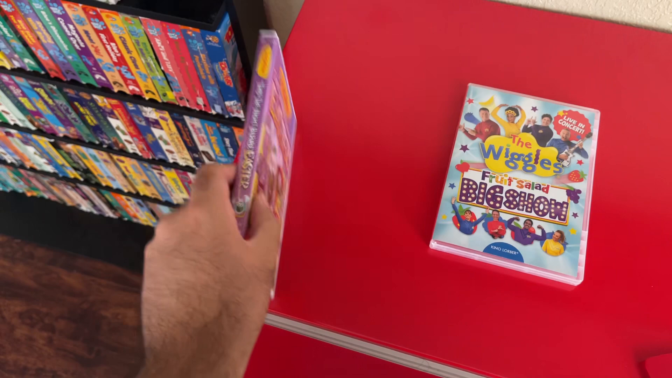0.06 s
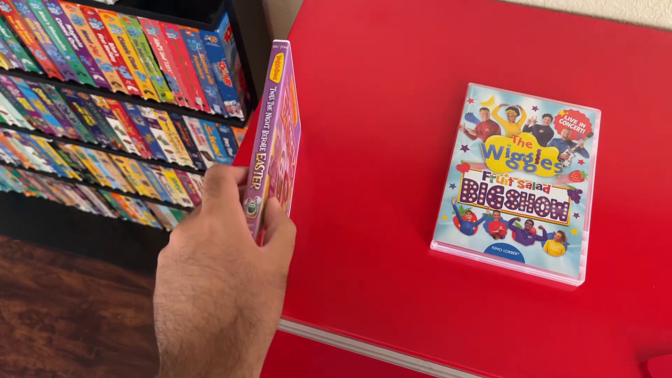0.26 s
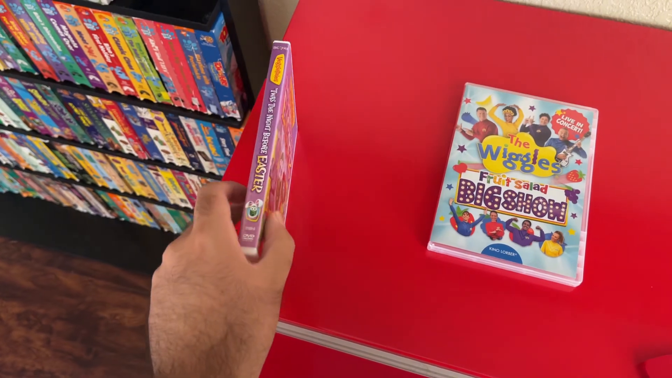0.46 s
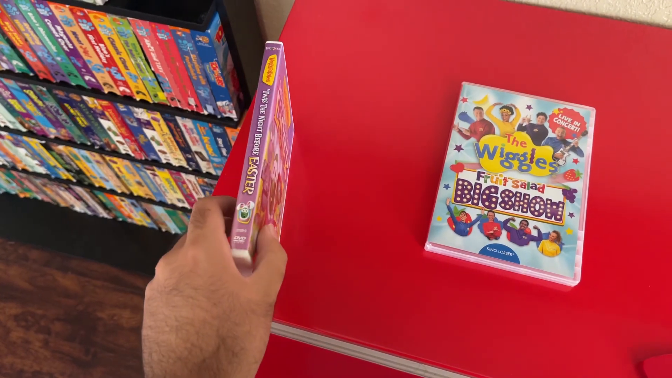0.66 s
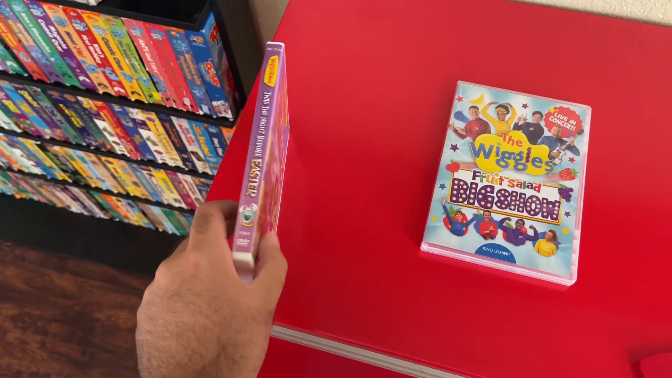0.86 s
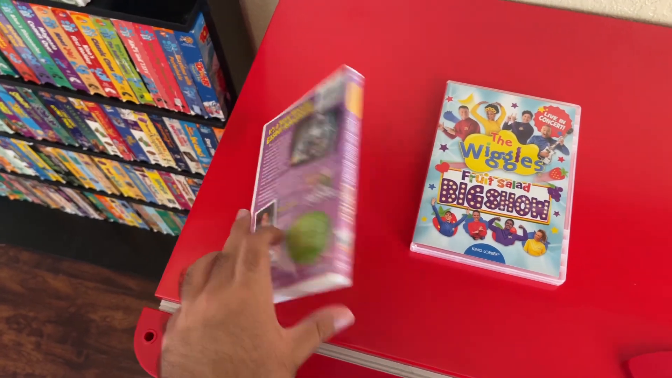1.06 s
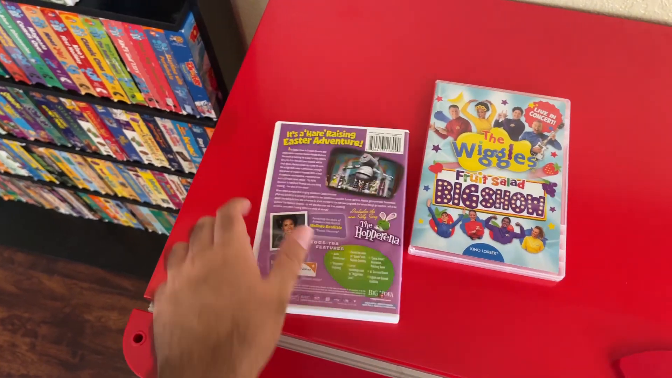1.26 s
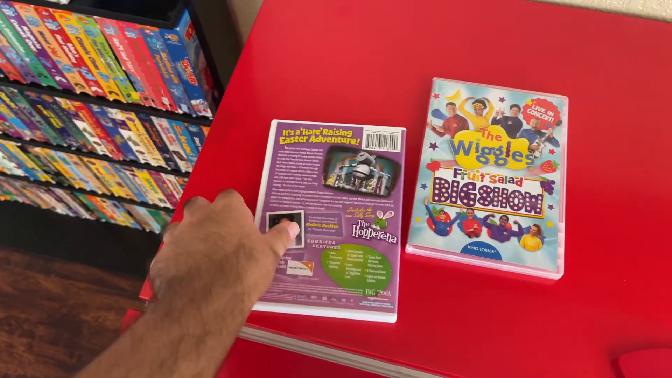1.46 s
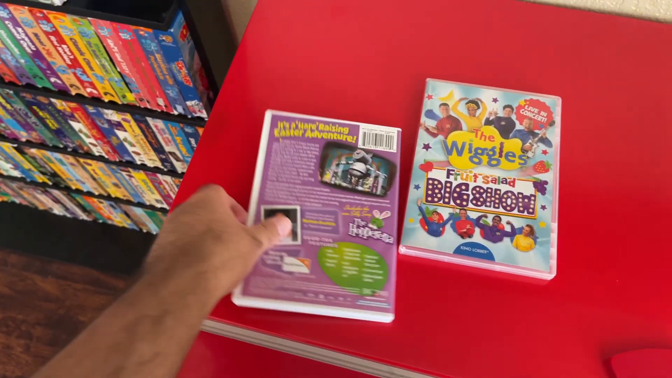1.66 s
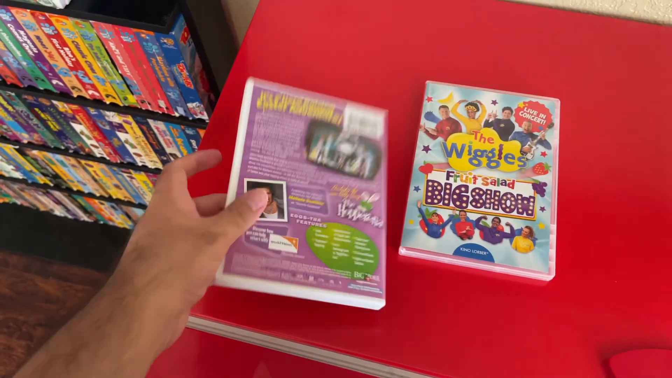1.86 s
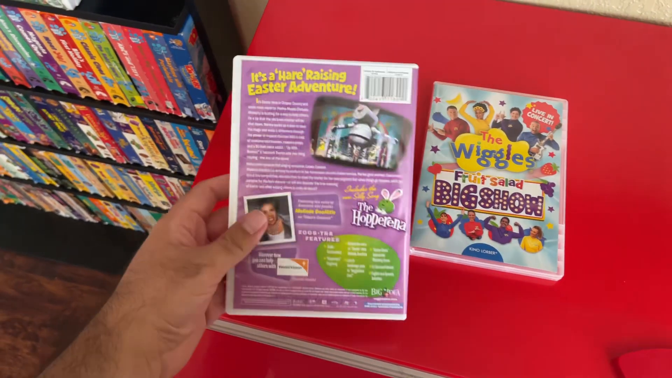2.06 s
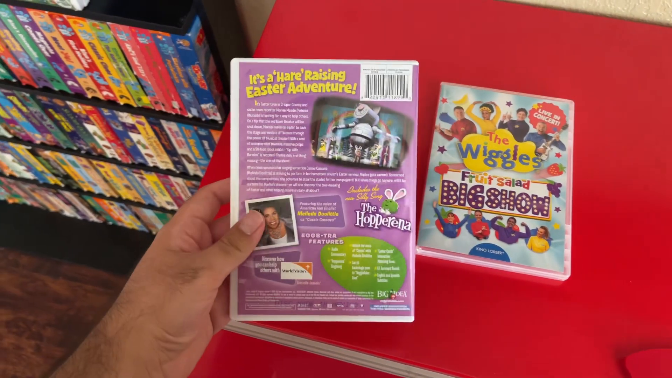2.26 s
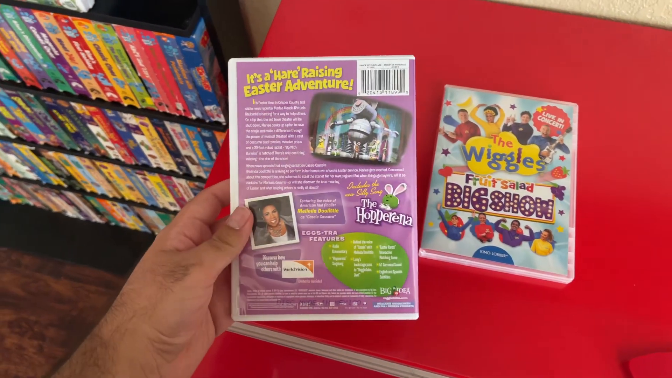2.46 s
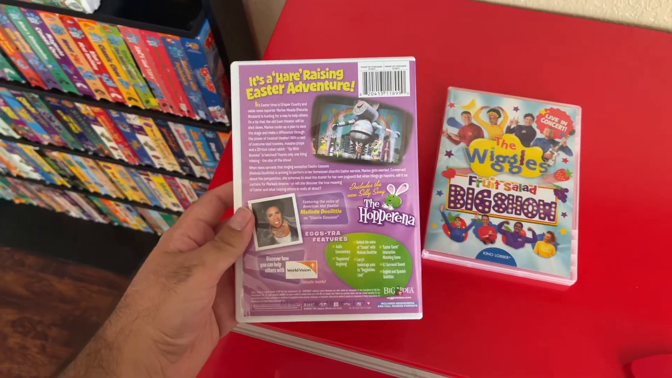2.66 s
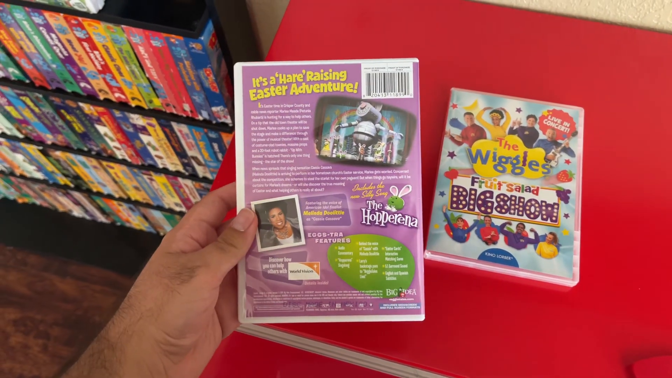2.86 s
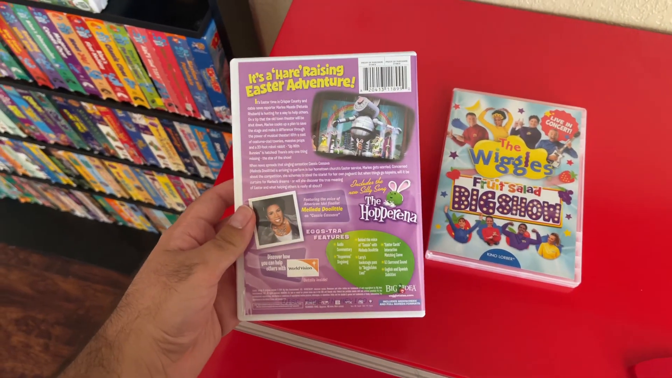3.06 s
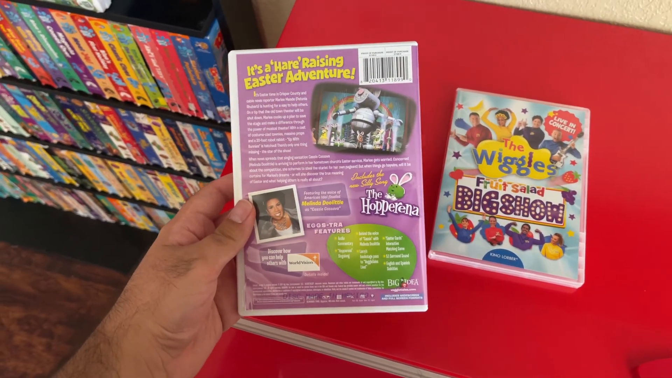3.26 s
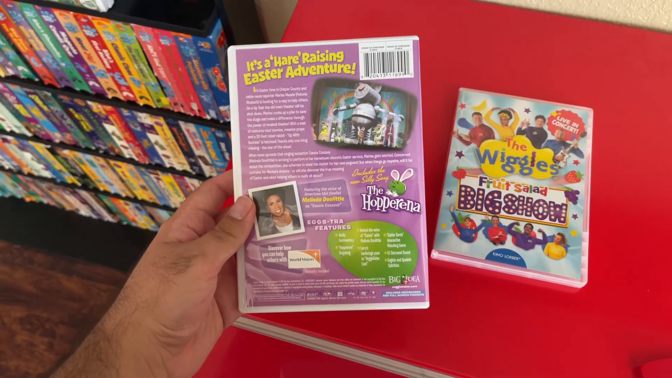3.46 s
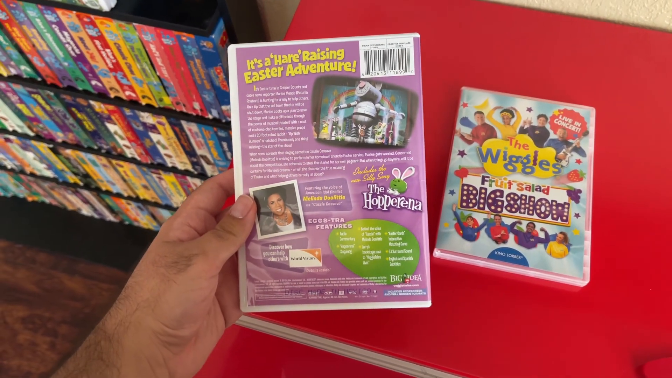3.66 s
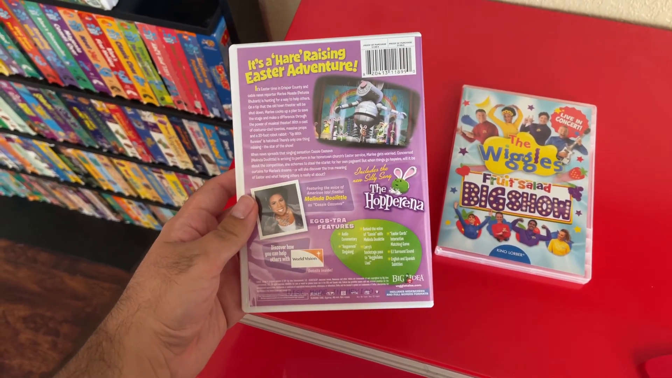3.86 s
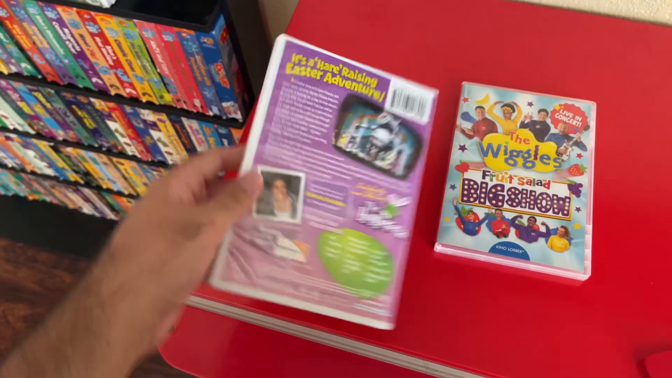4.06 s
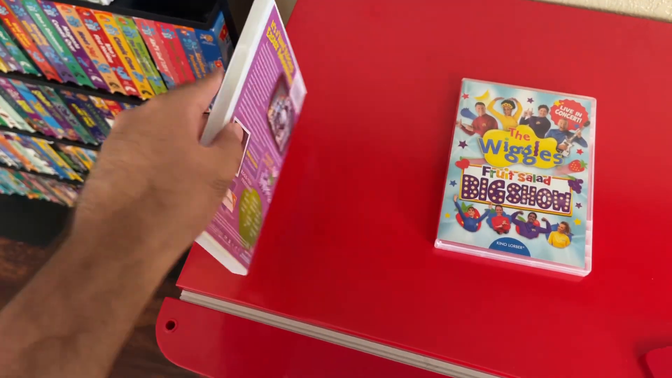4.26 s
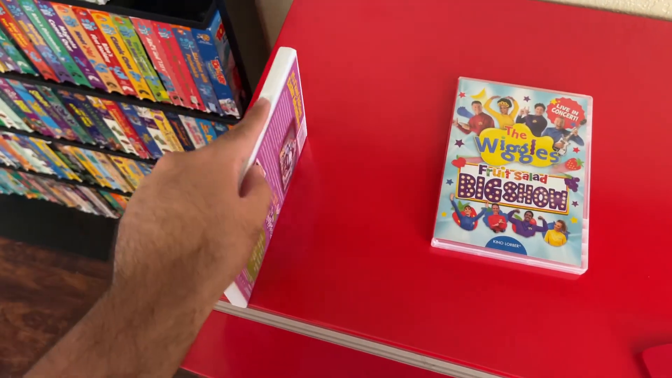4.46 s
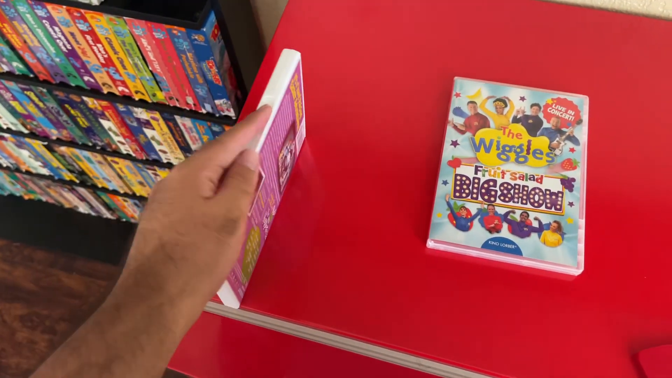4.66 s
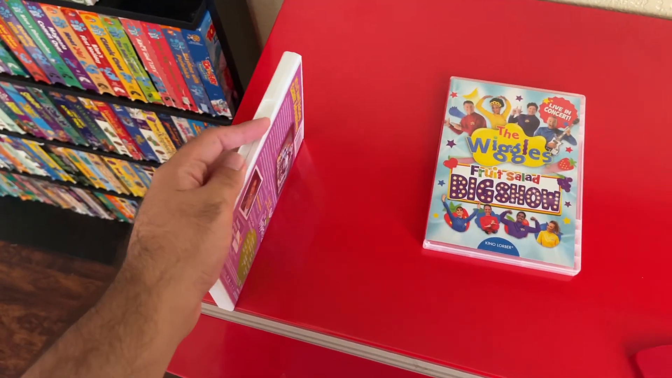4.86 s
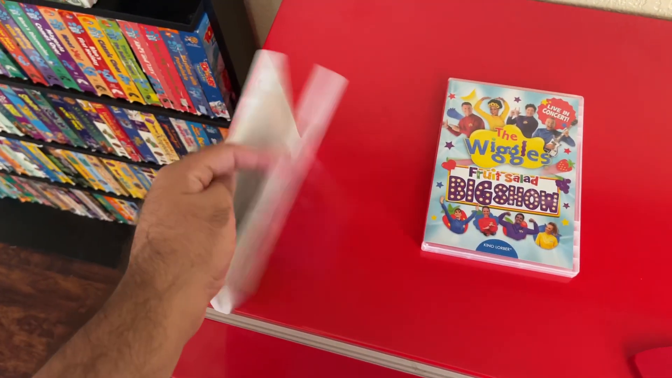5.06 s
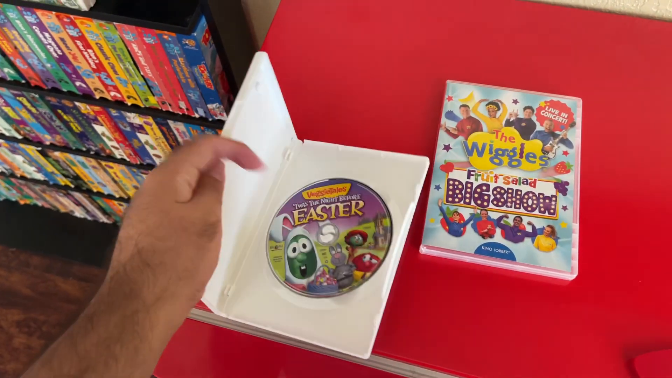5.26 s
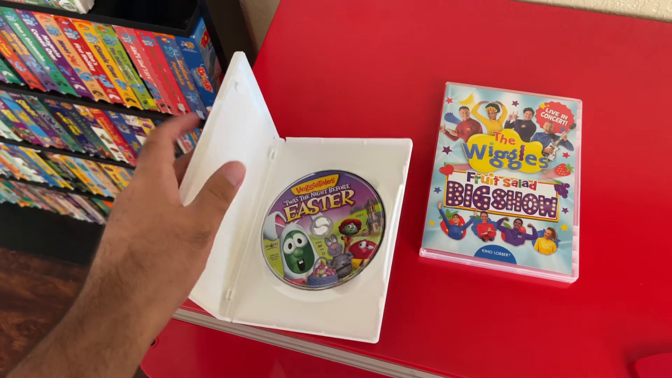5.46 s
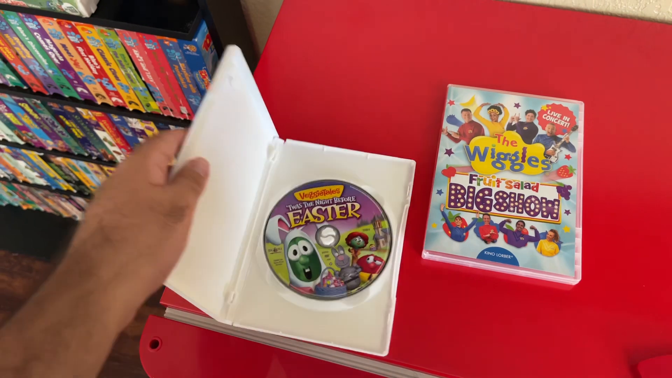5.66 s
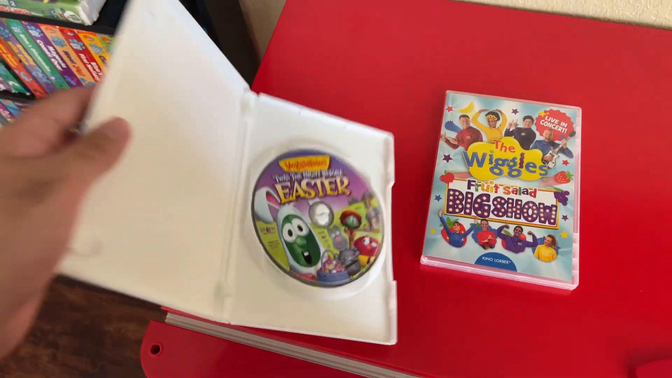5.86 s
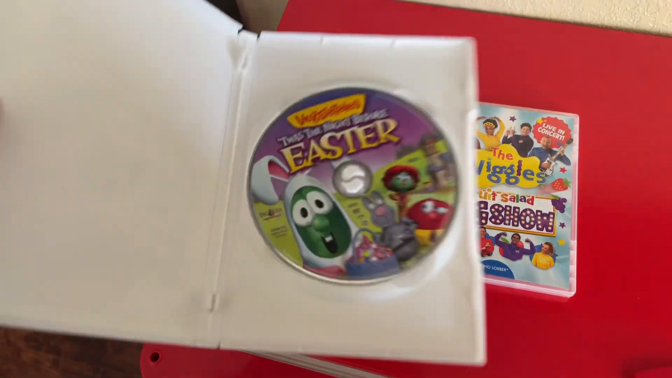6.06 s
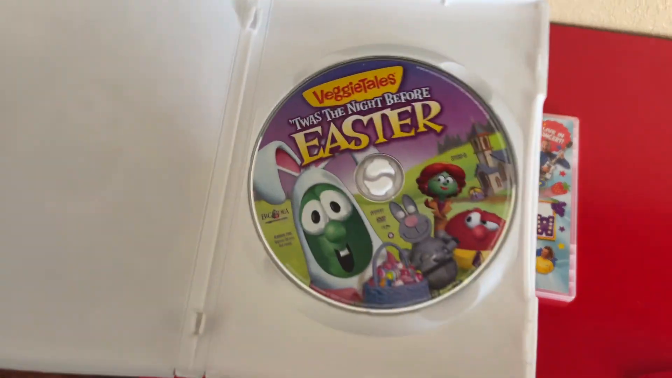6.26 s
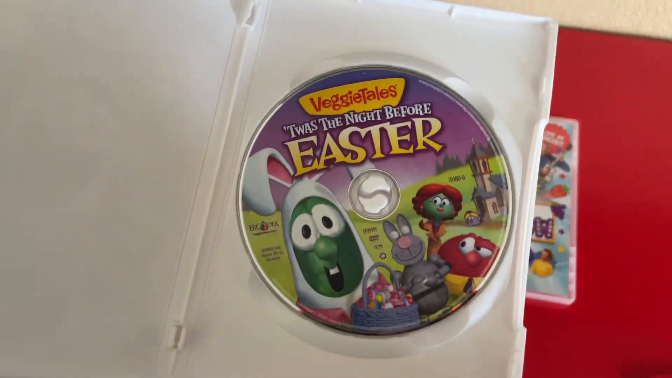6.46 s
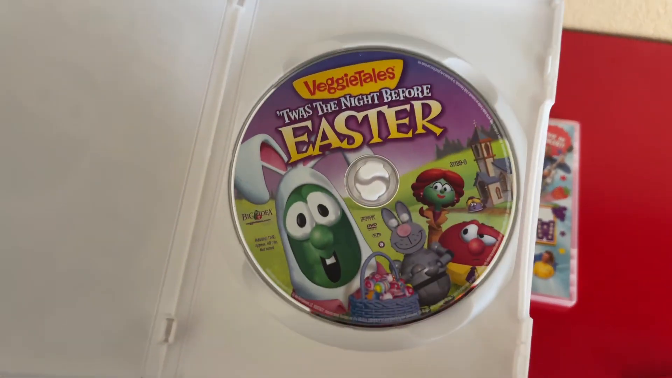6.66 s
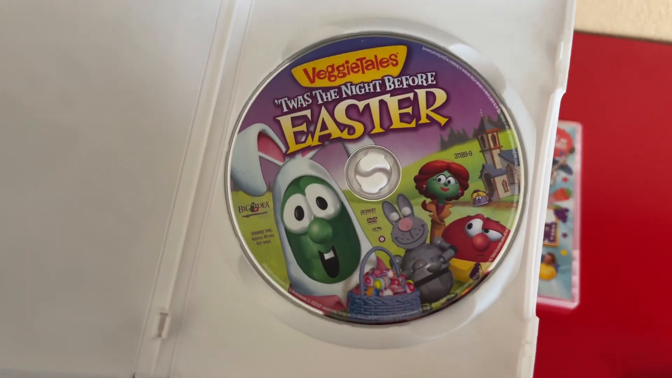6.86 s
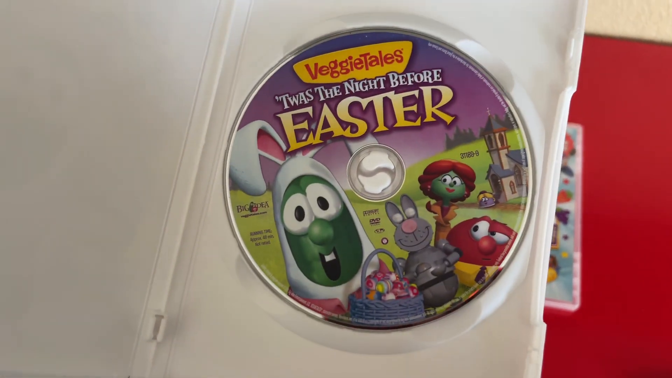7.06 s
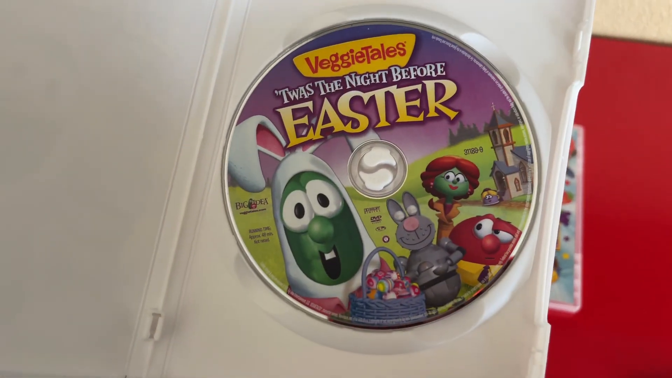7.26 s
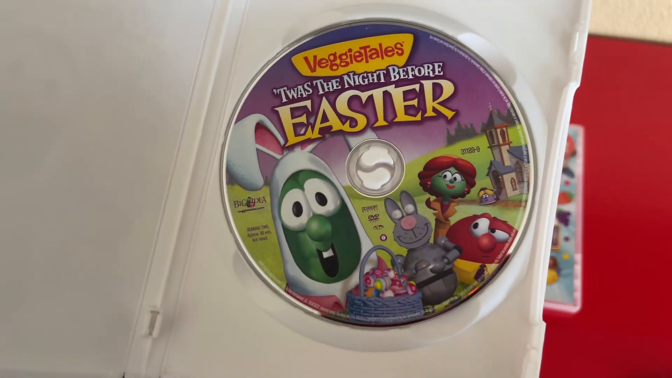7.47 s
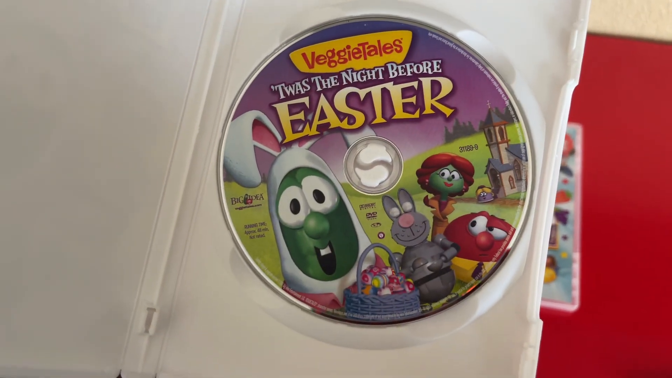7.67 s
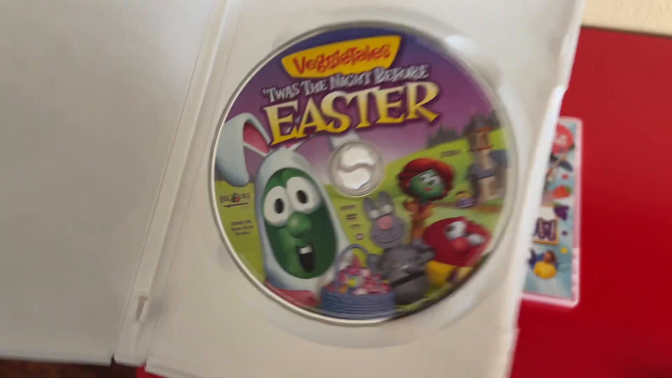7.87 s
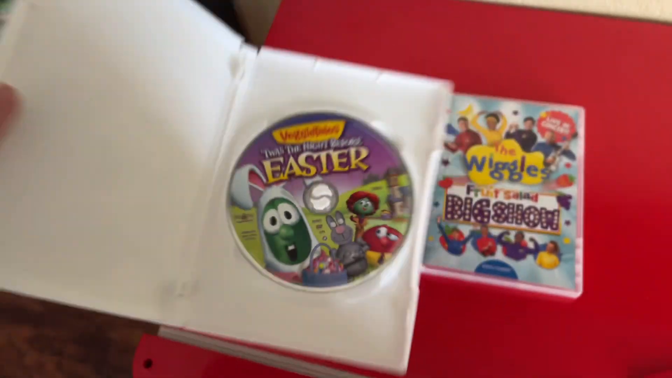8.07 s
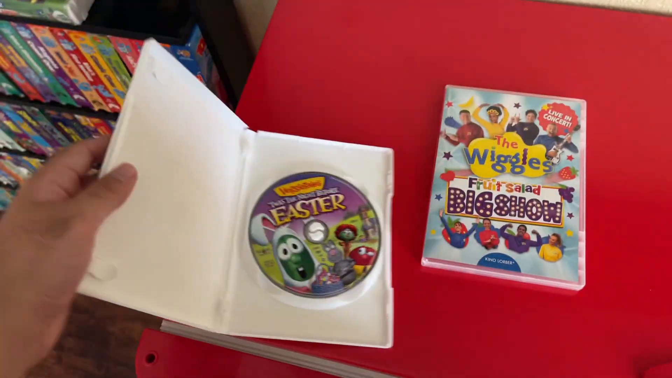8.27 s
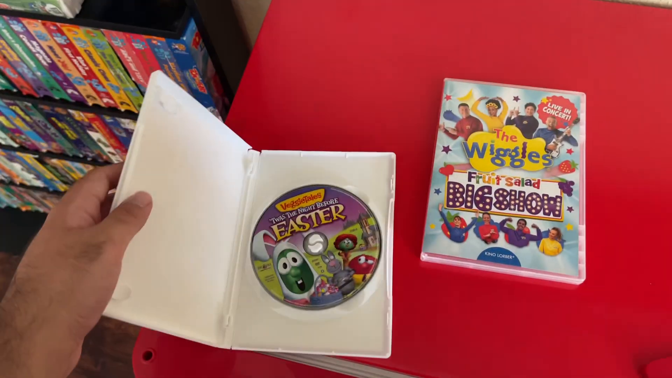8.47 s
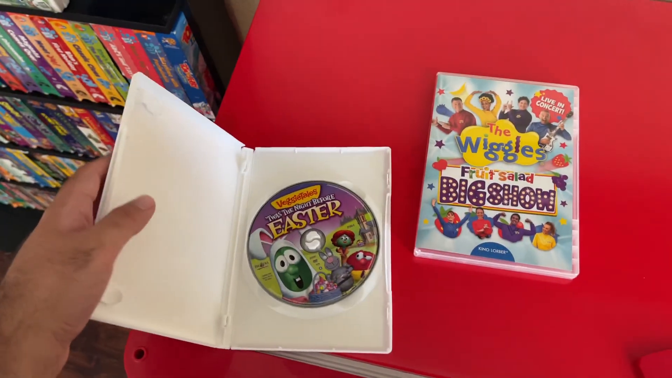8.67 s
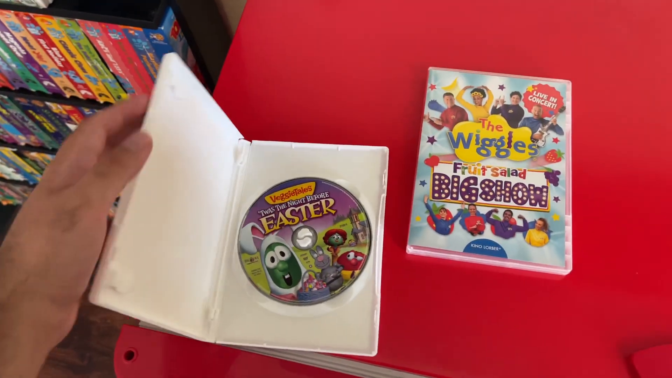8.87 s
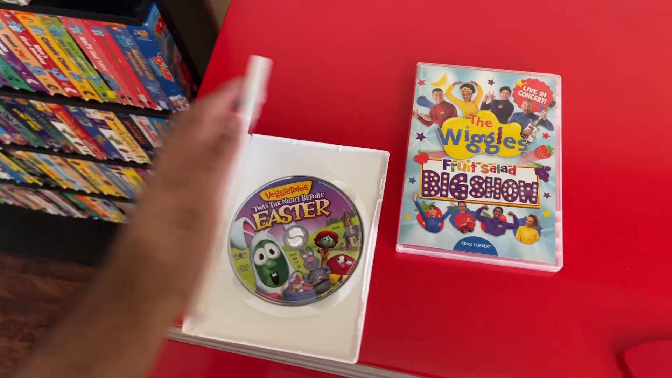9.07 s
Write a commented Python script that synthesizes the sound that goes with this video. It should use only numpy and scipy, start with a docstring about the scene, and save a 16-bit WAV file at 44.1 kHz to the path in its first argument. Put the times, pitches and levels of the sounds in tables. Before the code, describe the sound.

A thin plastic disc case is knocked, dropped flat, turned over, snapped open and set down on a sheet-metal top over a low steady hum.

```python
"""Disc case handled on sheet metal

A thin plastic disc case is stood up, dropped flat, picked up, snapped open and set down on a sheet-metal top.
Each contact is a short noise burst that rings the modes of case and top and dies away in a small room;
fingers sliding on the sleeve are swelling strokes of noise, pushed air is a short low swing.
A compressor hums nearby as a comb of thin sine overtones, over a filtered-noise room rumble and hiss."""
import sys
import numpy as np
from scipy import signal
from scipy.fft import rfft, irfft, next_fast_len
from scipy.io import wavfile

SR = 44100
rng = np.random.default_rng(int(sys.argv[2]) if len(sys.argv) > 2 else 0)


def wrap_up_sound(samples):
    """Save the sound to the file named by the first command line argument, as 16-bit audio."""
    columns = np.atleast_2d(samples).T
    # keep every value between -1 and 1, then stretch to whole-number steps
    tamed = np.clip(columns, -1, 1)
    steps = np.round(tamed * 32767).astype(np.int16)
    wavfile.write(sys.argv[1], SR, steps)


N = 401751


def amp(db):
    """Turn dB into gain."""
    return np.exp(np.asarray(db) * (np.log(10) / 20))


def rms_one(x):
    """Scale to rms 1."""
    return x / np.sqrt(np.mean(x ** 2) + 1e-20)


def at_hz(points, hz):
    """Read a (Hz, value) table on a log-frequency axis."""
    table = np.array(points)
    return np.interp(np.log(hz), np.log(table[:, 0]), table[:, 1])


def sides(pan_db):
    """Left and right gains for a left-minus-right balance in dB."""
    return amp(np.array([[.5], [-.5]]) * pan_db)


def drift(rate):
    """Slow random wander of spread 1, made from twice-smoothed noise; a higher rate wanders faster."""
    step = 40   # samples between slow values
    pole = np.exp(-2 * step * np.pi * rate / SR)
    white = rng.standard_normal(N // step + 2002)
    slow = signal.lfilter([1], [1, -2 * pole, pole * pole], white)[2000:]   # settled part only
    return np.interp(np.arange(N) / step, np.arange(len(slow)), rms_one(slow - slow.mean()))


def bands(length, spectrum):
    """Third-octave bands of stereo noise, each with its level and left-right likeness: yields (Hz, band)."""
    # How alike left and right are. Each row: frequency in Hz, likeness (1 is identical, 0 is unrelated).
    likeness = [(60, 1), (200, .93), (400, .75), (700, .45), (1300, .3), (3000, 0.46), (6000, 1),
                (9000, 0.68)]
    edges = 22.5 * 2 ** (np.arange(30) / 3)
    white = rng.standard_normal((2, 2, length))
    edges = edges[edges > spectrum[0][0] / 2]
    for k, (low, high) in enumerate(zip(edges, edges[1:])):
        band_filter = signal.butter(2, [low, high], "band", fs=SR, output="sos")
        mid, side = signal.sosfilt(band_filter, white[k % 2])   # neighbouring bands use separate noise
        hz = np.sqrt(low * high)
        alike = np.clip(at_hz(likeness, hz), -1, 1)
        stereo = np.sqrt(1 + alike) * mid + np.sqrt(1 - alike) * side * [[1], [-1]]
        yield hz, amp(at_hz(spectrum, hz)) * stereo


def room_noise():
    """Steady rumble and hiss: shaped noise with each band flickering a little."""
    # Colour of the rumble and hiss. Each row: frequency in Hz, relative density in dB per Hz.
    noise_colour = [(25, -30.5), (45, -2), (70, -5.5), (95, -13.5), (160, -9), (250, -21.5), (500, -29),
                    (1000, -41), (1700, -43.5), (2100, -39.5), (2500, -49.5), (4100, -49), (5200, -65),
                    (7200, -64), (8800, -56.5), (11000, -61.5), (13000, -75.5)]
    level_db = -49   # rms
    noise = sum(band * amp(1.4 * drift(3.0)) for hz, band in bands(N, noise_colour))
    return amp(level_db) * rms_one(noise)


def compressor():
    """Sine hum, overtones that change with the place of the microphone, and a separate whine."""
    # The fundamental. Each row: time in seconds, level in dB rms before panning.
    hum_level = [(0.0, -35.5), (1.37, -37), (1.77, -34.5), (3.27, -37), (6.54, -35), (9.11, -35.5)]
    # Place of the microphone. Each row: time in seconds, closeness (0 held back, 1 held close).
    closeness = [(5.7, 0.017), (6.1, 1), (7.9, 0.97), (8.3, 0)]
    # Overtone numbers, one per row of the next table: multiples of the motor speed.
    multiples = [9, 15, 18, 19, 24, 31, 33, 34, 35, 36, 37, 38, 47, 48, 52, 53, 61, 65, 66, 71]
    # Each row: level in dB rms held back, level in dB rms held close, left-minus-right in dB,
    # left lead in radians.
    overtones = [(-75.5, -75.5, 9.5, 0.86), (-81.5, -88, 0.5, 0.44), (-84.5, -83, -2.5, -1.2),
                 (-84.5, -84.5, 8.5, 1.35), (-91, -88.5, -4.5, 0.1), (-91.5, -88, -3.5, -0.5),
                 (-73.5, -91, -2, -0.4), (-71, -74.5, -0.5, -1.2), (-81, -76, 5, 0), (-77.5, -83, 9.5, 1.2),
                 (-78, -79, -2.5, 0.3), (-87.5, -89, 1, -0.2), (-91.5, -99, 6.5, 0.0),
                 (-91, -82, -3.5, 1.5), (-84, -90.5, 1, 0.7), (-81.5, -85.5, 3, 2.1), (-88, -101, 5, 1.0),
                 (-82.5, -87, -2.5, 0.65), (-86.5, -100.5, -3.5, 0.5), (-88.5, -82, -1.5, 0.24)]
    motor_hz, whine_hz = 59.21, 360.7
    hum_pan_db, whine_db = -2.5, -66.5
    rattle_back_db, rattle_close_db = -101, -107   # per line of the faint high cluster, before scatter

    t = np.arange(N) / SR
    turn = 2 * np.pi * motor_hz * t
    close = np.interp(t, *np.transpose(closeness))
    out = amp(np.interp(t, *np.transpose(hum_level))) * np.sin(turn) * sides(hum_pan_db)

    angle = turn % (2 * np.pi)
    for multiple, (back_db, close_db, pan_db, lead) in zip(multiples, overtones):
        level = amp(back_db + (close_db - back_db) * close + 0.98 * drift(.5))
        phase = multiple * angle + rng.uniform(0, 2 * np.pi) + [[lead], [0]]
        out += level * np.sin(phase.astype(np.float32)) * sides(pan_db)

    # one turn of the cluster at multiples 128 to 161, read again on every turn
    cycle = np.linspace(0, 2 * np.pi, 16384)
    cluster = sum(amp(rng.normal(0, 4.0)) * np.sin(k * cycle + rng.uniform(0, 2 * np.pi))
                  for k in range(128, 162))
    rattle_db = rattle_back_db + (rattle_close_db - rattle_back_db) * close + 1.5 * drift(0.45)
    out += amp(rattle_db) * np.interp(angle, cycle, cluster)

    whine_level = amp(whine_db + 0.97 * drift(1.5))
    whine = np.sin(2 * np.pi * whine_hz * t + 0.72 * drift(1.5))
    out += whine_level * whine * sides(hum_pan_db)
    return np.sqrt(2) * out   # sine levels become rms


def chatter(age):
    """Spectra of two unrelated noise bursts that swell and die, their spectra evened out."""
    burst = rfft(rng.standard_normal((2, len(age))) * (1 - np.exp(-2.5 * age)) * np.exp(-age))
    even = irfft(burst / np.abs(burst) ** .8, len(age))
    return rfft(even * np.clip(4 * age, 0, 1) * (age < 7))


def contact_colour(hz, knock_db, knock_hz, snap_db, snap_hz, tick_db, softness):
    """Knock, snap and tick fall away from their pitches and add in power; soft touches dull the first two."""
    tick_hz = 11000   # where the tick is strongest
    knock_fall_db, snap_fall_db, tick_fall_db = 13, 8.5, 20.5   # per octave away from each pitch
    soft_fall_db = 7   # further loss per octave above the snap, for each step of softness
    dull_db = soft_fall_db * (softness - 1) * np.maximum(np.log2(hz / snap_hz), 0)
    humps = [(knock_db - dull_db, knock_hz, knock_fall_db),
             (snap_db - dull_db, snap_hz, snap_fall_db),
             (tick_db, tick_hz, tick_fall_db)]
    power = sum(amp(db - fall_db * np.abs(np.log2(hz / top_hz))) ** 2 for db, top_hz, fall_db in humps)
    return 10 * np.log10(power)


def contacts():
    """Each contact is a burst of chatter that cracks, and strikes every mode with a strength of its own."""
    # Blows and touches. Each row: start in seconds, knock of case and top in dB, its pitch in Hz,
    # snap of the plastic in dB, its pitch in Hz, tick of the edge in dB, length in ms before softening.
    contact_rows = [(0.0779, -28.5, 500.0, -49, 3400.0, -49, 2), (0.084, -20.5, 370.0, -44, 1800, -47, 3.9),
                    (0.0897, -23, 490.0, -32.5, 4890, -30, 3), (0.0935, -23, 680, -60, 900.0, -52.5, 1.7),
                    (0.103, -25, 220.0, -46, 1800.0, -55.5, 4), (1.063, -60, 240.0, -60, 3903, -69, 6.9),
                    (1.162, -6, 330, -14, 1120, -28, 1.1), (1.1854, -30, 870.0, -30, 3600, -40, 4.1),
                    (1.192, -29, 600, -36, 3400, -54, 3.1), (1.202, -25, 270.0, -35, 1000.0, -63, 1.9),
                    (1.313, -37, 370.0, -70, 6000.0, -90, 2), (1.451, -46, 290.0, -48.5, 990, -62, 3.2),
                    (1.468, -44, 340.0, -59, 3500, -90, 4.0), (1.508, -56, 400.0, -61.5, 1800.0, -90, 1.5),
                    (1.65, -57, 340.0, -55.5, 1000.0, -78, 2.1), (1.761, -39.5, 300.0, -42, 1200, -58, 1.9),
                    (1.772, -43, 250.0, -49.5, 1300.0, -76, 2.3), (1.852, -45, 900, -47.5, 4000, -68, 1.8),
                    (1.939, -47.5, 600, -48, 3000, -90, 2.7), (1.96, -48, 620, -52, 3000, -75, 3.2),
                    (2.036, -52, 950, -56, 3000, -90, 0.9), (2.094, -58, 950, -57, 2800, -90, 2.7),
                    (4.238, -51.5, 230.0, -62.5, 2500.0, -66, 3.1),
                    (4.311, -50.5, 560.0, -54.5, 2500.0, -54, 3.2),
                    (4.388, -19, 420, -30.5, 990, -30.5, 2.8), (4.404, -21, 290.0, -46, 4500, -56, 3.9),
                    (4.415, -22.5, 310.0, -40.5, 2330, -90, 4.9),
                    (4.747, -55, 340.0, -55, 1500.0, -68, 3.0), (4.757, -46, 650.0, -49, 1700, -60, 4.0),
                    (4.77, -48, 440.0, -50, 4300, -56, 2.2), (4.831, -54, 370.0, -57, 4000, -90, 2.8),
                    (4.876, -52, 610.0, -56, 4200, -80, 4.2), (4.895, -57, 420.0, -58, 1200.0, -90, 2.2),
                    (4.919, -55, 360.0, -57, 4200, -80, 4.1), (5.0215, -28.5, 430.0, -27, 1500.0, -29, 1.5),
                    (5.025, -18, 680, -26, 5700.0, -31, 2.03), (5.036, -29, 250.0, -23.5, 4100.0, -57, 8.4),
                    (5.047, -35, 680.0, -22, 4600, -23, 3.2), (5.07, -49, 230.0, -31, 1700.0, -28, 1.7),
                    (5.088, -33, 690.0, -35, 4300.0, -49, 2.5), (5.097, -40, 370.0, -30.5, 4800, -48, 2.6),
                    (5.615, -43, 710.0, -38.5, 3300, -53, 3.2),
                    (5.621, -30, 310.0, -33.5, 2470, -35.5, 4.3), (5.63, -34, 190.0, -41, 4200, -90, 2.6),
                    (5.647, -53, 230.0, -43.5, 1800.0, -58, 1.6), (7.89, -58, 230.0, -50, 2400, -90, 2.4),
                    (8.064, -65, 230.0, -60, 1700.0, -87, 3.5), (8.095, -62, 300.0, -58, 1300.0, -80, 2.1),
                    (8.177, -29, 740.0, -29, 4000, -26, 5.0), (8.184, -20, 300.0, -18, 1900, -24, 3.2),
                    (8.196, -44, 310.0, -31, 3300, -45, 4.7), (8.212, -31.5, 290.0, -33, 3610, -90, 5.5),
                    (8.227, -32, 390.0, -27, 4200, -32, 6.3), (8.235, -37, 230.0, -36, 1300.0, -41, 2.8),
                    (8.436, -49, 320.0, -62.5, 4800.0, -79, 2.3),
                    (9.018, -59, 310.0, -57, 2700.0, -60, 4.3), (9.041, -54, 230.0, -57, 2500, -38, 3),
                    (9.053, -59, 300.0, -59, 2600.0, -39, 5.0)]
    # What case and top ring with. Each row: frequency in Hz, relative level in dB, t60 in seconds.
    case_modes = [(180, -8.5, 0.04), (270.5, 4.5, .08), (332.5, -2, 0.043), (446.8, 4.5, .05),
                  (529, -1.5, 0.032), (619, 2, .035), (814, 1.5, .03), (1040, -5.5, .025),
                  (1360, -5.5, .015), (1616, 1, 0.011), (1880, -1, 0.014), (2080, -3.5, 0.015),
                  (2570, -3.5, 0.015), (2950, -1, 0.012), (3120, -3, .01), (3700, -4.5, 0.0093),
                  (4900, -5, .007), (5330, -5.5, .006), (5900, -8, 0.0096)]
    # Edges in Hz of the parts, about an octave wide, that the colour of a contact is set in.
    part_edges_hz = [150, 350, 700, 1300, 2500, 4500, 8000, 15500]
    spread_ms = 1.6   # delay of 250 Hz behind the top, for a blow
    ring_db = 1.5   # ringing against the bare crack
    ping_db, ping_octaves = 11, .35   # modes near the pitch of the snap are struck harder

    size = 6144
    out, t = np.zeros((2, N + size)), np.arange(size) / SR
    hz = np.fft.rfftfreq(size, 1 / SR) + 1
    z = np.exp(-2j * np.pi * hz / SR)   # one sample of delay
    parts = [signal.sosfreqz(signal.butter(3, edge, "band", fs=SR, output="sos"), hz, fs=SR)[1]
             for edge in zip(part_edges_hz, part_edges_hz[1:])]
    centres = np.sqrt(np.multiply(part_edges_hz[:-1], part_edges_hz[1:]))
    modes = []
    for mode_hz, level_db, t60 in case_modes:
        r, w = amp(-60 / (t60 * SR)), 2 * np.pi * mode_hz / SR
        resonance = (1 - z * z) / (1 - 2 * r * np.cos(w) * z + r * r * z * z)
        modes.append(amp(level_db) * np.sqrt(1 - r) * resonance)
    mode_pitches = np.array(case_modes)[:, 0]
    # bending waves: delay grows as one over the root of pitch, so a blow sweeps downward, a light touch less
    sweep = -4j * np.pi * spread_ms / 1000 * np.sqrt(250 * hz)
    # the ports hear different faces of the case, most of all in the middle range
    unlike = .45 * np.clip(hz / 1200, 0, 1) * np.clip(9500 / hz - .6, .2, 1)

    for s, knock_db, knock_hz, snap_db, snap_hz, tick_db, length_ms in contact_rows:
        # light touches of soft fingers smear out
        softness = np.clip((-max(knock_db, snap_db, tick_db) - 27) / 12, 1, 2.5)
        parts_db = contact_colour(centres, knock_db, knock_hz, snap_db, snap_hz, tick_db, softness)
        mid, side = chatter(1000 * t / max(length_ms * softness, .1))

        near_snap = np.exp(-(np.log2(mode_pitches / snap_hz) / ping_octaves) ** 2)
        strength = amp(ping_db * near_snap + rng.normal(0, 3.0, len(modes)))
        rung = strength @ np.array(modes)
        body = 1 + amp(ring_db) * rung / np.sqrt(np.mean(np.abs(rung[hz < 7000]) ** 2))

        # each part carries the energy of its level held for 14 ms
        colour = 0
        for db, part in zip(parts_db, parts):
            energy = np.sum(np.abs(part * body * mid) ** 2)
            colour = colour + amp(db) * part * np.sqrt(.007 * SR * size / energy)
        pair = (mid + unlike * side * [[1], [-1]]) * body * colour * np.exp(sweep / softness)
        at = round(s * SR)
        out[:, at:at + size] += irfft(pair, size)
    return out[:, :N]


def room(x):
    """A tail of noise that builds within a few ms and dies band by band."""
    # Decay of the late tail. Each row: frequency in Hz, t60 in seconds.
    tail_t60 = [(150, 0.48), (500, 0.51), (2000, 0.49), (5000, 0.3867), (10000, 0.39), (14000, 0.02)]
    # Colour of the tail. Each row: frequency in Hz, relative density in dB per Hz.
    tail_colour = [(150, -1.5), (1000, -1), (4000, 1.5), (12000, -3.5)]
    tail_db = -8.5   # tail energy against the mono sound that feeds it
    t = np.arange(SR // 2) / SR
    tail = sum(band * amp(-60 * t / at_hz(tail_t60, hz)) for hz, band in bands(len(t), tail_colour))
    # near surfaces answer first and loudest
    tail = tail * (1 - np.exp(-t / 0.0019)) * (1 + 1.0 * np.exp(-t / .03))
    tail = tail / np.sqrt(np.sum(tail ** 2) / 2)
    return amp(tail_db) * signal.fftconvolve(x.mean(axis=0)[None], tail)[:, :N]


def rustle():
    """Fingers on the sleeve: flickering noise for dense grains of skin and film; each stroke swells and sinks."""
    # Colour of the rubbing. Each row: frequency in Hz, relative density in dB per Hz.
    rustle_colour = [(600, -14), (1500, -2.5), (3000, -3), (6000, -3.5), (9000, -2), (12000, -4.5),
                     (15000, -10.5)]
    # Slides. Each row: start in seconds, loudest moment in seconds, end in seconds, level in dB.
    stroke_rows = [(.2, .45, .95, -71), (1.3, 1.45, 1.9, -71), (1.7, 1.9, 2.1, -75), (2.4, 2.751, 3.1, -78),
                   (3.8, 4.33, 4.9, -76), (4.451, 4.8, 5.1, -71), (5.1, 5.17, 5.89, -59),
                   (5.6, 5.7, 6.4, -74), (7.6, 7.95, 8.2, -88), (8.5, 8.8, 9.0, -80),
                   (8.85, 9.1, 9.5, -64.5)]
    swell_db = 20   # depth of the ramps in dB; the floor is then taken off so a stroke starts from silence
    t = np.arange(N) / SR
    strokes = 0
    for start, loudest, end, level_db in stroke_rows:
        swell = amp(np.interp(t, [start, loudest, end], [-swell_db, 0, -swell_db])) - amp(-swell_db)
        strokes = strokes + amp(level_db) * swell
    flicker = amp(2.5 * drift(33.0))
    return flicker * strokes * rms_one(sum(band for hz, band in bands(N, rustle_colour)))


def puffs():
    """Air pushed out as the case swings or lands: a few low swings of pressure that rise and die."""
    # Each row: start in seconds, peak of the envelope in dB, time to that peak in ms.
    puff_rows = [(4.401, -36, 18), (5.03, -21, 5.1), (8.19, -31, 10), (8.241, -36.5, 9)]
    puff_hz = 92
    out = np.zeros(N)
    for s, level_db, length_ms in puff_rows:
        t = np.arange(SR // 5) / SR
        age = 1000 * t / length_ms
        envelope = amp(level_db) * age * np.exp(1 - age)
        out[round(s * SR):][:len(t)] += envelope * np.sin(2 * np.pi * puff_hz * t)
    return out


def microphone(x):
    """Both ports have peaks and narrow dips near the top, then fall away; they differ in level and phase."""
    # Colour of both ports. Each row: frequency in Hz, gain in dB.
    port_colour = [(8000, 0.5), (9500, 6.5), (10250, -5), (11000, 8), (12000, -4), (13000, -18),
                   (13800, -25), (14800, -20)]
    # Each row: frequency in Hz, left-minus-right in dB.
    port_balance = [(200, -1.5), (450, -2), (750, 0), (1200, 0.5), (5000, 0)]
    # Each row: frequency in Hz, phase in radians by which left leads.
    port_lead = [(150, .1), (500, .3), (950, .8), (2070, 0.4), (3010, 1.5), (6890, 0.5), (7840, 1.5),
                 (8790, -1), (9700, -2.5), (11800, -5), (14700, -10)]
    size = next_fast_len(N + 4096)
    hz = np.fft.rfftfreq(size, 1 / SR) + 1
    phase = np.exp(1j * at_hz(port_lead, hz) * [[.5], [-.5]])
    ports = sides(at_hz(port_balance, hz)) * phase
    return irfft(rfft(x, size) * amp(at_hz(port_colour, hz)) * ports, size)[:, :N]


def scene():
    """Handling in the room over rumble and hiss, all through the microphone colour; the compressor is added."""
    handling = contacts() + rustle()
    heard = handling + room(handling) + puffs() + room_noise()
    return microphone(heard) + compressor()


def record(dry):
    """The lowest rumble is cut, the highest peaks are rounded, the top is cut."""
    cutoff_hz = 16900
    x = signal.sosfilt(signal.butter(2, 36, "high", fs=SR, output="sos"), dry)
    x = x / (1 + np.abs(x) ** 4) ** .25
    return signal.sosfilt(signal.cheby2(12, 70, cutoff_hz, fs=SR, output="sos"), x)


dry = scene()
out = record(dry)
wrap_up_sound(out)
```